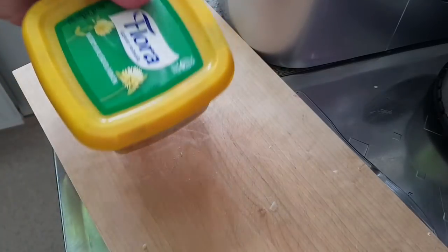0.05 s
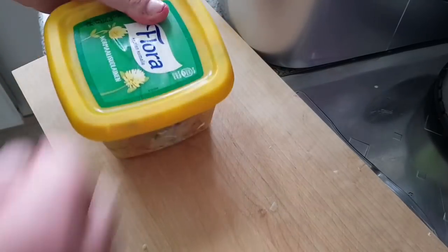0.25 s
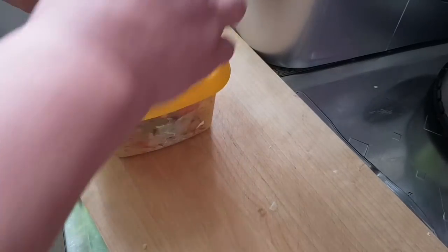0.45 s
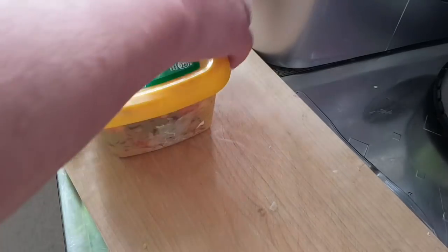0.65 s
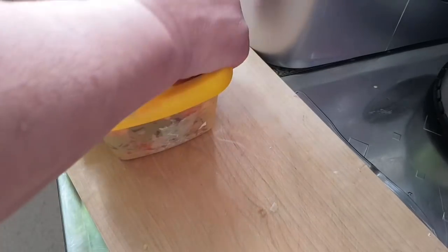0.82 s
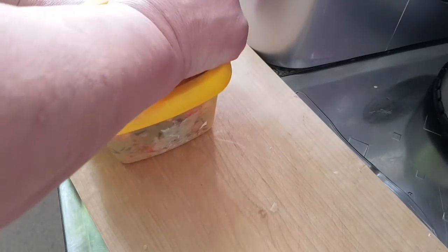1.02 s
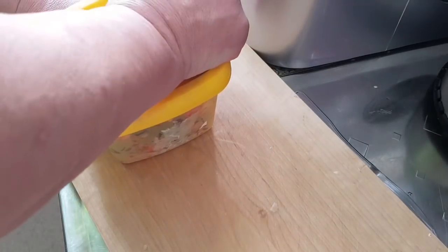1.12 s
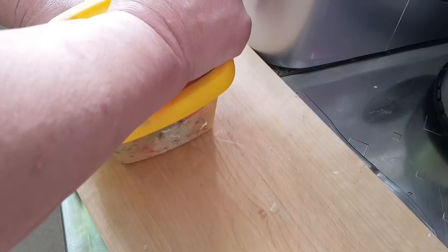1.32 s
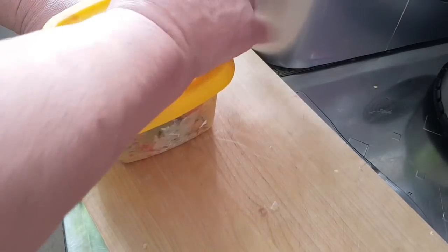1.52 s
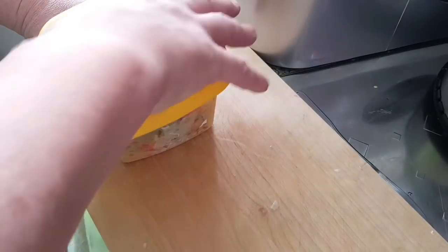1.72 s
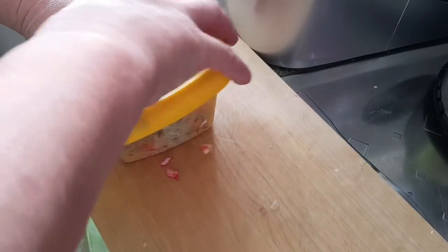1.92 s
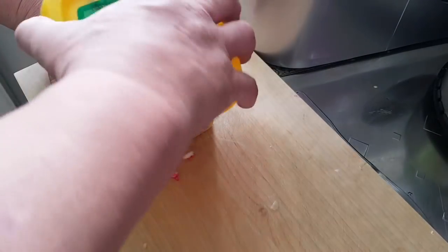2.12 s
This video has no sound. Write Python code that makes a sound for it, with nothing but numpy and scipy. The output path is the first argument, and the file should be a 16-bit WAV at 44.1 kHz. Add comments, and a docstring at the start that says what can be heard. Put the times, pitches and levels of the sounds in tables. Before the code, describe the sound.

Close to the microphone in a small kitchen, a plastic food tub is set down on wood and closed. A knock and a palm slap come first, then the rim snaps shut, the walls pop and the tub taps the board.

```python
"""Closing a food tub

Close up in a small kitchen, in stereo. A plastic tub of chopped food rustles and lands on a wooden
board, and both ring. A palm slaps the lid, slides and presses until the rim snaps home; the walls pop
as the hand lets go. On a new grip the tub clacks lightly on the board. Faint room tone lies behind."""
import sys
import numpy as np
from scipy import signal
from scipy.fft import rfft, irfft
from scipy.io import wavfile
from scipy.ndimage import uniform_filter1d

SR = 44100
rng = np.random.default_rng(int(sys.argv[2]) if len(sys.argv) > 2 else 0)


def file_out(sig):
    """Save sig as 16-bit WAV at sys.argv[1]."""
    # one column per channel
    cols = np.atleast_2d(sig).T
    # limit, then scale
    lim = np.clip(cols, -1, 1)
    pcm = np.round(lim * 32767).astype(np.int16)
    wavfile.write(sys.argv[1], SR, pcm)


N = 94815
CLOCK = np.arange(N) / SR  # seconds into the scene
T = np.arange(SR // 2) / SR  # seconds into one event

# The rim slipping over its catch. Each row: start in seconds, click in dB, treble cutoff in Hz,
# rim ring in dB, thump in dB, left over right in dB.
RIM_SNAPS = [(0.0837, -10.5, 2790, -28, -45, 3.5), (1.071, -14, 7100, -7, -42, 0),
             (1.0895, -22, 5960, -26, -24, 8), (1.1072, -9.5, 5940, -28, -6.5, -2),
             (1.1243, -3.5, 5660, -10.5, -12, 1.5), (1.1356, -12, 9500, -36, -15, 6),
             (1.268, -27, 7000, -28, -20, 12), (1.2967, -21, 13900, -36, -34, -16),
             (1.3006, -1.5, 17200, -10, -13, 2), (1.3024, -2.5, 11800, -16, -5, 3.5),
             (1.613, -27, 6700, -39, -37, 5), (1.6307, -22.5, 7000, -46, -13, -2)]
# The walls popping in or out. Each row: start in seconds, level in dB, pitch in Hz, t60 in seconds.
WALL_FLEXES = [(0.0301, -6, 441, 0.015), (.032, -17.5, 846, 0.023), (.052, -21, 470, 0.021),
               (0.0752, -13, 428, 0.022), (.082, -20.5, 793, 0.029), (1.072, -13.5, 486, 0.01),
               (1.088, -8, 442, 0.14), (1.107, -0.5, 400, 0.01), (1.1237, 4, 503, 0.041),
               (1.125, -12.5, 278, 0.029), (1.126, -12, 709, 0.017), (1.145, -5.5, 578, 0.033),
               (1.284, -8, 410, 0.0072), (1.302, -2, 540, 0.016), (1.303, -9.5, 824, 0.03),
               (1.3026, 1.5, 213.6, 0.047), (1.465, -16.5, 468, 0.11), (1.6133, -3, 505, 0.023),
               (1.66, -17, 824, .06), (1.79, -23.5, 536, 0.027), (1.81, -20, 572, 0.044),
               (1.85, -21.5, 520, 0.01)]
# The tub landing, edge after edge. Each row: start in seconds, ring in dB, crack in dB,
# treble cutoff in Hz.
LANDING_KNOCKS = [(.209, 10, 12.5, 9000), (0.2119, 1, 11.5, 2500)]
# The hand meeting the lid. Each row: start in seconds, thump in dB, pat in dB, pat pitch in Hz,
# skin slap in dB.
PALM_BLOWS = [(0.4192, -2.5, -6, 476, -7), (0.4223, 1.5, 4, 306, -12), (0.434, -5, -38, 252, -44),
              (0.629, -39, -32, 1030, -32), (1.65, -39, -14, 1242, -15.5), (1.656, -2, -10, 420, -16),
              (1.695, -27, -18, 396, -28), (1.776, -26, -37, 500, -33)]
# The tub's edge on the board. Each row: start in seconds, ring in dB, click in dB, treble cutoff in Hz.
EDGE_TAPS = [(1.9819, -9, 1, 7000), (1.9942, -4.5, 1, 7560), (2.0565, -15.5, -9.5, 1400),
             (2.098, -31, -20.5, 1450), (2.124, -24, -23, 2433)]
# Skin sliding on the lid. Each row: centre in seconds, half width in seconds, hiss in dB, murmur in dB.
SKIN_RUBS = [(0.268, 0.033, -53, -35.5), (0.412, 0.053, -56, -49), (.61, 0.064, -53.5, -64),
             (0.778, 0.019, -58.5, -68), (.87, 0.054, -57, -63.5), (1.272, 0.038, -60, -45),
             (1.438, .05, -61, -49), (1.819, 0.026, -55.5, -47.5), (1.922, 0.061, -70, -51.5)]

# What rings. Each row: pitch in Hz, relative level in dB, t60 (time to fall 60 dB) in seconds.
RIM_MODES = [(2404, 1.5, .025), (3210, 6.5, 0.023), (3583, 7, 0.018), (3980, 2.5, 0.0083),
             (6100, -1.5, 0.011), (7780, -7, 0.0062)]
BOARD_MODES = [(162, -14, .35), (232, -5, .2), (284, -2, .2), (370, -6, .06), (503, -3, .15),
               (560, -10, .12), (592, -6, .16), (865, 0, .13), (1029, -8, .1), (1171, -4, .12),
               (1302, -9, .1), (1424, -7, .1), (1500, -9, .08), (2135, -13, .13)]  # tub and board together
BOUNCE_MODES = [(53.8, -6.5, 0.073), (108.3, -5, 0.048), (147, 0, 0.2), (166.7, -12.5, 0.23),
                (233, -8.5, 0.12)]  # the loaded tub on the board
EDGE_MODES = [(570, -5, .16), (1160, -3, .05), (1270, -5, .04), (2165, -2, .17), (2290, -6, .06),
              (2700, -12, .06), (3290, -6, .12), (3382, -8, .12), (4120, -12, .07), (4420, -12, .06)]

# The tone of each contact and noise. Each row: frequency in Hz, relative level in dB.
SNAP_SPECTRUM = [(100, -17), (450, -1), (800, 4), (1100, 2.5), (1400, 3.5), (2100, -3.5), (3400, -2),
                 (4800, -5.5), (7000, -6), (8700, -21.5), (11500, -12), (15000, -24)]
LANDING_SPECTRUM = [(30, -21.5), (130, 3), (300, 0.5), (580, 2.5), (720, -4.5), (840, 5), (960, -8),
                    (1150, 1.5), (1480, -9), (1750, -14), (3500, -25), (7000, -27), (9000, -40.5),
                    (15000, -41)]
SLAP_SPECTRUM = [(100, -15), (600, 8), (1400, 2.5), (3000, -9), (6500, -17.5), (9000, -36), (15000, -21)]
CLACK_SPECTRUM = [(100, -47), (380, -10), (680, -1.5), (1150, 3.5), (1600, -5), (2200, 6.5), (2900, -3.5),
                  (4300, -2), (6300, -10.5), (8700, -24), (11000, -19), (15000, -25)]
SKIN_SPECTRUM = [(300, 1), (1300, -2), (1900, -2.5), (3000, -1), (5000, -0.5), (7200, -1.5), (8800, -12),
                 (13500, -4), (16000, -64)]
WALL_SPECTRUM = [(40, -28), (130, -21), (260, -8.5), (520, 3), (750, -12), (1400, -12.5), (2500, -23),
                 (8000, -40)]
FOOD_SPECTRUM = [(60, -53), (200, 1.5), (450, 5), (1000, -2), (2200, -13), (6000, -29.5), (9000, -42),
                 (15000, -44)]
ROOM_TONE_SPECTRUM = [(20, -22), (50, -3.5), (80, -9.5), (135, 1.5), (200, -15.5), (300, -17.5),
                      (500, -20.5), (1000, -26.5), (1400, -25.5), (1900, -35.5), (3200, -30.5),
                      (7000, -36.5), (9000, -44.5), (14500, -43)]

# The kitchen's decay. Each row: frequency in Hz, t60 in seconds.
KITCHEN_DECAY = [(60, 0.78), (160, 0.31), (300, 0.45), (600, 0.3), (1800, 0.28), (5000, 0.24),
                 (14000, 0.24)]
# The tone of its reflections. Each row: frequency in Hz, relative level in dB.
KITCHEN_SPECTRUM = [(60, -2), (160, 1.5), (300, -8), (600, -2), (1200, -3.5), (3000, -1), (12000, -4)]
# Stereo width at the microphones. Each row: frequency in Hz, side against mid in dB.
STEREO_WIDTH = [(60, -11), (150, -14.5), (300, -8), (600, -4), (1200, -1), (2400, -0.5), (12000, 0)]


def lid():
    """The rim snaps over its catch and pings while the walls pop under the load."""
    out = np.zeros((2, N))
    for start, click_db, bright_hz, rim_db, thump_db, pan_db in RIM_SNAPS:
        snap = amp(click_db) * click(SNAP_SPECTRUM, bright_hz, scatter_s=0.0022, scatter_db=22)
        ping = amp(rim_db) * ring(RIM_MODES, skew=0.55)
        pan = amp([[pan_db / 2], [-pan_db / 2]])
        add(out, start, pan * (snap + ping) + amp(thump_db) * thump())
    for start, db, hz, t60 in WALL_FLEXES:
        add(out, start, amp(db) * pop(hz, t60, rise_s=0.0016))
    return out


def landing():
    """The tub's base hits the board and both ring."""
    out = np.zeros((2, N))
    for start, ring_db, crack_db, bright_hz in LANDING_KNOCKS:
        board = amp(ring_db) * unit(soften(ring(BOARD_MODES), bright_hz))
        crack = amp(crack_db) * click(LANDING_SPECTRUM, bright_hz, scatter_s=0.0032, scatter_db=11.5)
        add(out, start, board + crack)
    return out


def palm():
    """Skin slaps the lid, the lid gives, and the whole tub thumps."""
    out = np.zeros((2, N))
    for start, thump_db, pat_db, pat_hz, slap_db in PALM_BLOWS:
        pat = amp(pat_db) * pop(pat_hz, t60=0.017, rise_s=0.0012)
        slap = amp(slap_db) * click(SLAP_SPECTRUM, bright_hz=12130, scatter_s=0.0027, scatter_db=5.5)
        add(out, start, amp(thump_db) * thump() + pat + slap)
    return out


def pop(hz, t60, rise_s):
    """A few swings of a heavily damped plastic panel."""
    swing = np.sin(2 * np.pi * hz * T + stereo_phase(hz, skew=0.13))
    attack = 1 - np.exp(-(T / rise_s) ** 2)
    return unit(swing * attack * amp(-60 * T / t60))


def thump(rise_s=0.0045):
    """The loaded tub takes a moment to start bouncing."""
    return unit(ring(BOUNCE_MODES) * (1 - np.exp(-T / rise_s)))


def clacks():
    """The stiff edge of the tub taps and bounces on the board."""
    out = np.zeros((2, N))
    for start, ring_db, click_db, bright_hz in EDGE_TAPS:
        edge = amp(ring_db) * unit(soften(ring(EDGE_MODES, skew=0.29), bright_hz))
        tap = amp(click_db) * click(CLACK_SPECTRUM, bright_hz, scatter_s=0.003, scatter_db=22)
        add(out, start, edge + tap)
    return out


def rubbing(grain_db=3):
    """Sliding skin hisses and makes the walls murmur."""
    hiss, murmur = (wash(rng.standard_normal((2, N)) * amp(grain_db * rng.standard_normal(N)), spectrum)
                    for spectrum in (SKIN_SPECTRUM, WALL_SPECTRUM))
    return sum(bell_curve(centre, width) * (amp(hiss_db) * hiss + amp(murmur_db) * murmur)
               for centre, width, hiss_db, murmur_db in SKIN_RUBS)


def food(pieces_per_s=6000, level_db=-41.5):
    """Many soft pieces shift against the walls in a dull rustle."""
    pieces = rng.standard_normal((2, N)) * (rng.random(N) < pieces_per_s / SR)
    return amp(level_db) * wash(pieces, FOOD_SPECTRUM) * bell_curve(centre_s=0.026, width_s=0.079)


def kitchen(direct, room_db, echoes_per_s=5000, delay_s=0.003, rise_s=0.0024, smooth_hz=70):
    """Direct sound reaches the microphones first, then reflections off worktop and walls."""
    echoes = rng.choice([-1., 1.], (2, len(T))) * (rng.random((2, len(T))) < echoes_per_s / SR)
    # Each band dies at its own speed.
    band_hz, t, bands = signal.stft(spread(echoes), SR, nperseg=256)
    decay = amp(-60 * t / read(KITCHEN_DECAY, band_hz)[:, None])
    tail = signal.istft(bands * decay, SR, nperseg=256)[1][:, :len(T)]
    onset = np.clip((T - delay_s) / rise_s, 0, 1)
    # The tail is evened out, then takes the room's tone.
    spectrum, hz = rfft(tail * onset), np.fft.rfftfreq(len(T), 1 / SR)
    power = uniform_filter1d(abs(spectrum) ** 2, size=round(smooth_hz / hz[1]), axis=1)
    tail = irfft(spectrum * amp(read(KITCHEN_SPECTRUM, hz)) / np.sqrt(power + 1e-20), len(T))
    fade = np.clip(2 - 2.5 * T / T[-1], 0, 1)
    return direct + amp(room_db) * signal.fftconvolve(direct, tail * fade, axes=1)[:, :N]


def room_tone(level_db=-51.5, rumble_hz=260, swell_db=2, swells_per_s=9.07):
    """Faint kitchen hiss over a low rumble that swells unevenly."""
    air = wash(rng.standard_normal((2, N)), ROOM_TONE_SPECTRUM)
    rumble = irfft(rfft(air) / (1 + (np.fft.rfftfreq(N, 1 / SR) / rumble_hz) ** 4), N)
    swell = np.interp(CLOCK * swells_per_s, np.arange(100), rng.uniform(-1, 1, 100))
    return amp(level_db) * (air - rumble + rumble * amp(swell_db * (swell - 0.5)))


def ring(modes, skew=0.6):
    """A struck body rings in dying modes of alternating sign."""
    out = np.zeros((2, len(T)))
    for k, (hz, db, t60) in enumerate(modes):
        sign = (-1) ** k
        swing = np.sin(2 * np.pi * hz * T + stereo_phase(hz, sign * skew))
        out += sign * amp(db) * unit(swing * amp(-60 * T / t60))
    return unit(out)


def click(spectrum, bright_hz, scatter_s, scatter_db):
    """One sharp contact followed by a quick scatter of tiny ones."""
    age = T / scatter_s
    scatter = spread(rng.standard_normal((2, len(T))))
    x = amp(scatter_db) * unit(scatter * np.exp(-age) * (1 - np.exp(-4 * age)))
    x[:, 0] += 1  # the first contact
    for _ in range(4):  # flatten the spectrum while keeping the click short
        flat = irfft(np.exp(1j * np.angle(rfft(x))), len(T))
        x = flat * np.exp(-(age / 10) ** 2)
    return unit(soften(colour(x, spectrum), bright_hz))


def soften(x, hz):
    """A softer contact loses its treble."""
    return signal.sosfilt(signal.butter(2, min(hz, SR / 2 - 1), fs=SR, output="sos"), x)


def stereo_phase(hz, skew):
    """Higher tones reach the two microphones more out of step."""
    return skew * amp(read(STEREO_WIDTH, hz)) * np.array([[1], [-1]])


def spread(x):
    """Two unrelated signals become a left-right pair that is alike in the bass."""
    width = amp(read(STEREO_WIDTH, np.fft.rfftfreq(x.shape[1], 1 / SR)))
    mid, side = rfft(x)
    pair = np.array([mid + side * width, mid - side * width])
    return irfft(pair / np.sqrt(1 + width ** 2), x.shape[1])


def wash(x, spectrum):
    """Coloured stereo noise at rms 1."""
    return unit(colour(spread(x), spectrum)) * np.sqrt(N)


def colour(x, spectrum):
    """Minimum-phase filter with the given spectrum."""
    log_gain = np.log(amp(read(spectrum, abs(np.fft.fftfreq(4096, 1 / SR)))))
    response = np.exp(np.conj(signal.hilbert(log_gain)))
    taps = np.fft.ifft(response).real[:len(log_gain) // 2]
    return signal.oaconvolve(x, taps[None], axes=1)[:, :x.shape[1]]


def bell_curve(centre_s, width_s):
    """A smooth rise and fall in level."""
    return np.exp(-((CLOCK - centre_s) / width_s) ** 2 / 2)


def amp(db):
    """Decibels to gain."""
    return 10 ** (np.asarray(db) / 20)


def unit(x):
    """Scales to a mean energy of 1 per channel."""
    return x / np.sqrt(np.mean(np.sum(x ** 2, -1)) + 1e-20)


def read(table, hz):
    """Reads a table on a log-frequency axis."""
    table_hz, value = np.transpose(table)
    return np.interp(np.log(hz + 1), np.log(table_hz + 1), value)


def add(mix, start_s, sound):
    """Mixes a sound in at its start time."""
    part = mix[:, max(round(start_s * SR), 0):][:, :sound.shape[-1]]
    part += sound[..., :part.shape[-1]]


def scene():
    """Knocks and snaps carry into the kitchen; rubbing and food stay dry and close, over room tone."""
    return (kitchen(landing(), room_db=-3) + kitchen(palm(), room_db=1.5)
            + kitchen(lid(), room_db=0) + kitchen(clacks(), room_db=-2)
            + rubbing() + food() + room_tone())


def record(dry, low_cut_hz=36, high_cut_hz=15100):
    """The recorder's low cut and band limit."""
    x = signal.sosfilt(signal.butter(2, low_cut_hz, "high", fs=SR, output="sos"), dry)
    band_limit = signal.firwin(301, high_cut_hz, window=("kaiser", 8), fs=SR)
    return signal.oaconvolve(x, band_limit[None], "same")


dry = scene()
out = record(dry)
file_out(out)
```